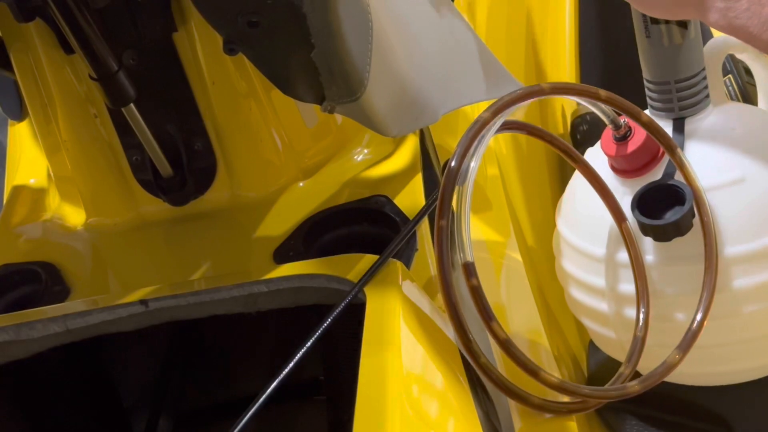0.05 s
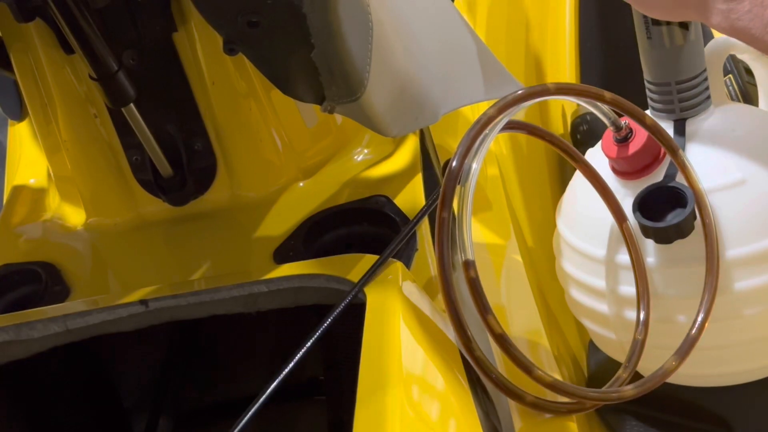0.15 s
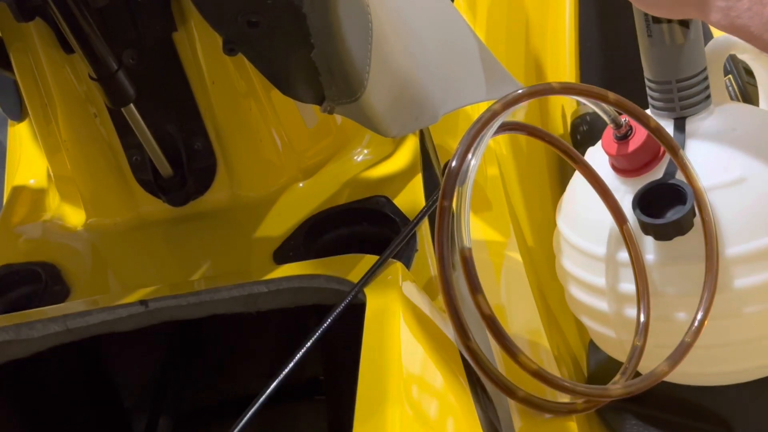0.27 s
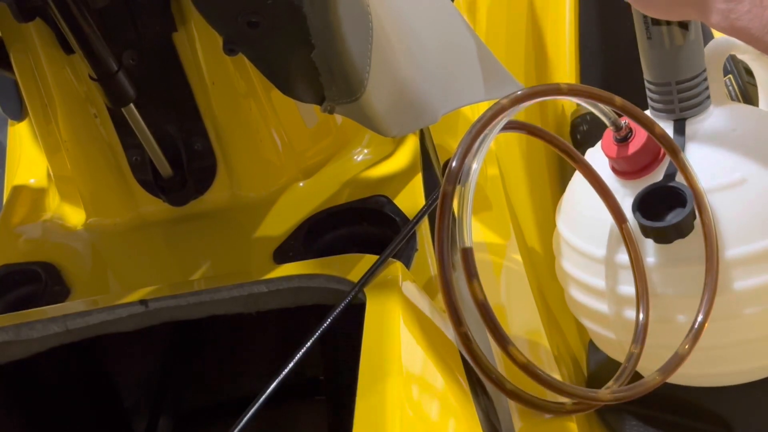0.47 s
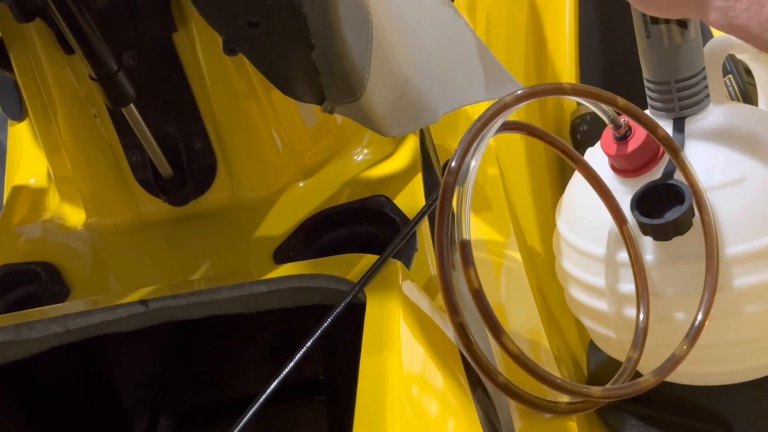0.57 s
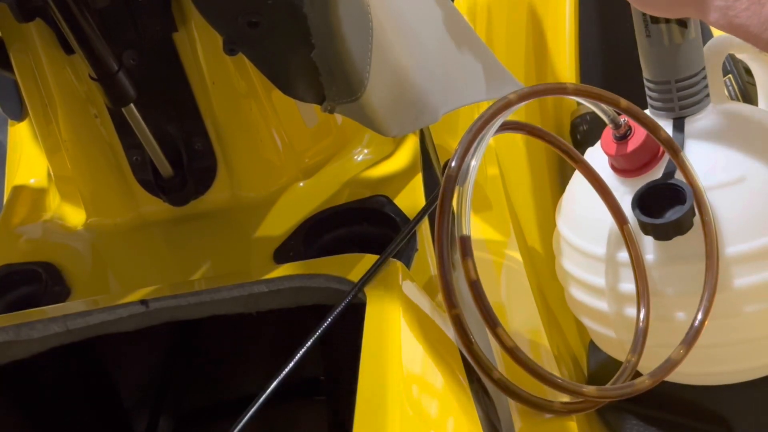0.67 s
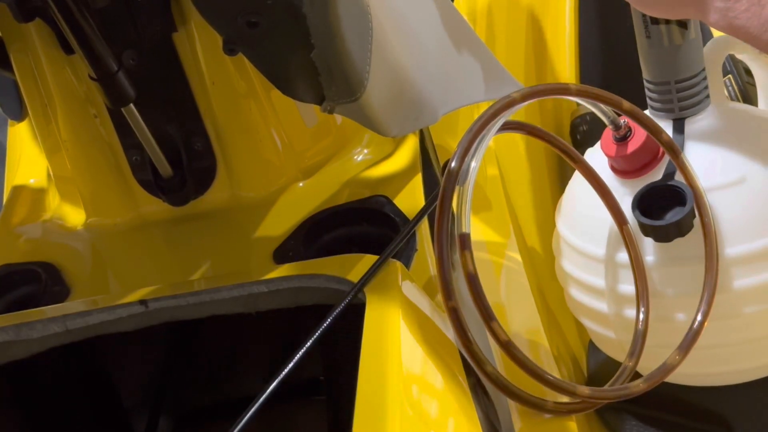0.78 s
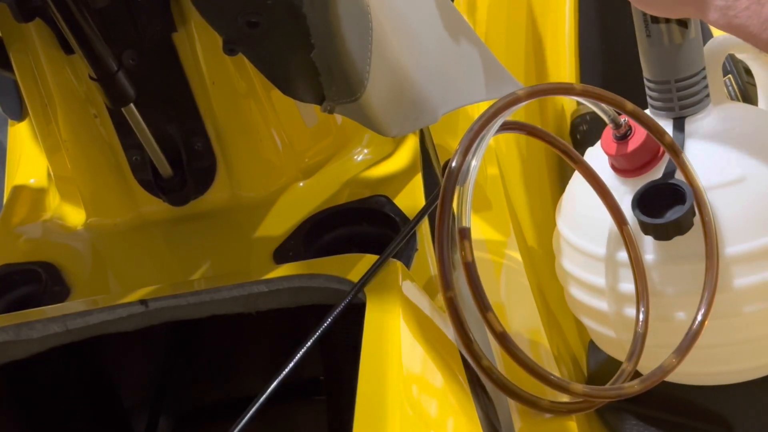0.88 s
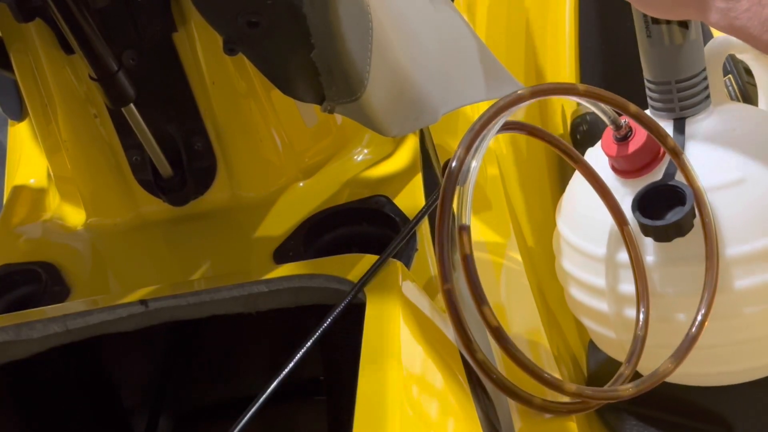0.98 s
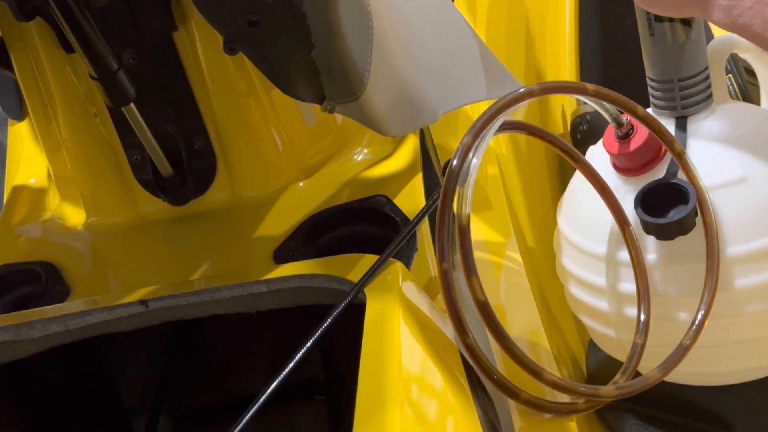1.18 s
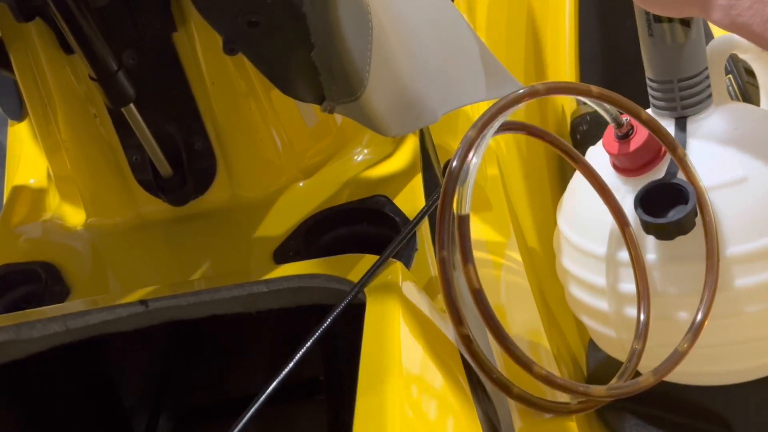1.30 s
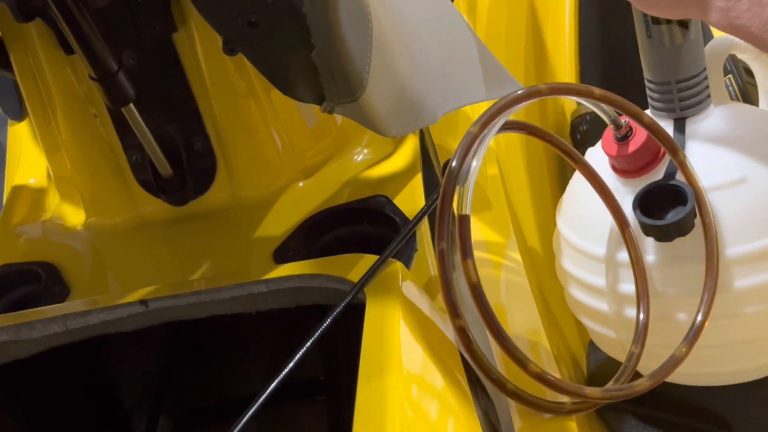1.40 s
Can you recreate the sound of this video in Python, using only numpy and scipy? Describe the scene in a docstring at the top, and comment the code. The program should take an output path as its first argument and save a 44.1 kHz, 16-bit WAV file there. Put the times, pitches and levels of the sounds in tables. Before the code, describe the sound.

A hand pump knocks hollowly three times, with rubbing and hissing air between strokes.

```python
"""A soft rub ends in a hollow knock: a hand pump on a plastic oil-extractor tank is pushed down.
It goes up and down again, and its piston rubs, hisses and knocks at each end of its travel.
The hollow tank answers each knock with a short note, and the garage around it booms.
A puff of air escapes after each downstroke. Faint whistles, light taps of the loose handle
and a low, steady background noise go with the pumping."""
import sys
import numpy as np
from scipy import signal
from scipy.fft import rfft, irfft
from scipy.io import wavfile
from scipy.ndimage import map_coordinates

SR = 44100
rng = np.random.default_rng(int(sys.argv[2]) if len(sys.argv) > 2 else 0)


def bounce(signal):
    """Save signal as a 16-bit WAV file at the path given by the first command-line argument."""
    frames = np.transpose(np.atleast_2d(signal))
    limited = np.clip(frames, -1, 1)
    pcm = np.round(limited * 32767).astype(np.int16)
    wavfile.write(sys.argv[1], SR, pcm)


N = 63945

# The piston hitting its stops:
# start_s, tank_db, pitch_factor, upper_tones_db, crack_db, crack_hold_s, thump_db, boom_db
KNOCKS = [(0.2206, 1.5, 1.025, -2, -23.5, 0.0036, -19.5, -33.5),
          (0.678, 1, 1.02, 4.5, -19.5, 0.0012, -29, -37),
          (1.1109, 1, 1.036, -0.5, -21.5, .0035, -18, -28.5)]
# The tones of the hollow tank: pitch_hz, level_db, fade_s (time to fall by 60 dB)
TANK_TONES = [(453.6, -16.5, 0.035), (614.8, -1, 0.033), (674.6, -2.5, 0.028), (779, -14, 0.016),
              (941.7, -9.5, 0.03), (1034, -14.5, 0.023), (1302, -26.5, 0.042), (1940, -25.5, 0.027),
              (2580, -39, 0.024), (3440, -42, 0.022), (3816, -30, 0.021)]
# The low tones of its base: pitch_hz, level_db, fade_s
BASE_TONES = [(151.2, -4.5, 0.065), (191.7, 2.5, 0.041), (251.7, -4.5, 0.037), (358.4, -2, 0.061)]
# How alike the room sounds left and right: frequency_hz, likeness (1 = the same)
ROOM_LIKENESS = [(50, 1), (150, 1), (300, 0.74), (650, 0.21), (1300, 0.77), (2500, 1), (16000, 1)]
TANK_RISE_S, BASE_RISE_S = 0.0014, 0.0017


def amp(db):
    """Turns decibels into a gain."""
    return 10 ** (np.asarray(db) / 20)


def unit(x):
    """Scales a signal to an average (rms) level of 1."""
    return x / np.sqrt(np.mean(x ** 2) + 1e-20)


def read(points, hz):
    """Reads between a table's rows on a log-frequency axis."""
    row_hz, value = np.transpose(points)
    return np.interp(np.log(hz + 1), np.log(row_hz + 1), value)


def bins(x):
    """The frequencies in the spectrum of x."""
    return np.fft.rfftfreq(x.shape[-1], 1 / SR)


def add(mix, start_s, sound):
    """Mixes a sound in at the given time."""
    part = mix[max(round(start_s * SR), 0):][:len(sound)]
    part += sound[:len(part)]


def colour(x, points):
    """Turns frequencies up or down by rows of frequency_hz, level_db."""
    return irfft(rfft(x) * amp(read(points, bins(x))), x.shape[-1])


def pair(x, likeness):
    """Blends two unrelated signals into a left and right that are as alike as asked."""
    alike = np.clip(read(likeness, bins(x)), -1, 1)
    mid, side = rfft(x) * np.sqrt([(1 + alike) / 2, (1 - alike) / 2])
    return irfft(np.array([mid + side, mid - side]), x.shape[-1])


def ring(tones, rise_s, pitch=1, upper_db=0, upper_hz=830):
    """A struck object's tones build up quickly, then die away."""
    t = np.arange(SR) / SR
    ringing = sum(amp(db + upper_db * (hz > upper_hz) - 60 * t / fade_s)
                  * np.sin(2 * np.pi * hz * pitch * t) for hz, db, fade_s in tones)
    return ringing * (1 - np.exp(-(t / rise_s) ** 2))


def air(spectrum, flutter_db=1.93):
    """Swirling air hisses with a slight flutter, the same left and right."""
    flutter = unit(colour(rng.standard_normal(N), [(120, 0), (1200, -60)]))
    hiss = pair(rng.standard_normal((2, N)), [(1, 1)])
    return unit(colour(hiss, spectrum) * amp(flutter_db * flutter))


def stroke(start_s, end_s, db, rise_s, swell_db_per_s, stop_s=0.0025):
    """The loudness of one stroke: it gathers speed and stops dead."""
    t = np.arange(N) / SR
    rise = np.clip((t - start_s) / rise_s, 0, 1)
    swell = amp(db + swell_db_per_s * np.minimum(t - end_s, 0))
    return rise * swell * np.exp(-np.maximum(t - end_s, 0) / stop_s)


def background(level_db=-45.5):
    """A low, steady noise fills the room."""
    # The background's tone: frequency_hz, level_db
    spectrum = [(20, -19), (45, 1), (70, 11.5), (110, -2), (200, -5), (280, -12.5), (370, 2), (480, -4.5),
                (630, 8.5), (850, -5.5), (1300, -11.5), (3000, -23), (7000, -26), (11000, -39),
                (16000, -52)]
    return amp(level_db) * unit(colour(pair(rng.standard_normal((2, N)), ROOM_LIKENESS), spectrum))


def garage(x, car_db=-9.5, car_fade_s=0.095, delay_s=0.0055, build_s=0.0079):
    """Sound scatters quickly off a car's body and echoes longer around the room."""
    # How long the echo lasts: frequency_hz, fade_s
    fade_times = [(60, 0.87), (200, 0.38), (400, 0.41), (700, 0.56), (1500, 0.69), (4000, 0.8), (9000, 0.2),
                  (16000, 0.6)]
    # The echo's tone: frequency_hz, level_db
    spectrum = [(60, 4), (180, 1), (350, 4), (620, -8.5), (1000, -11), (1400, -6.5), (2000, -11),
                (3000, -12), (5000, -11), (8000, -4), (16000, -15)]
    t = np.arange(SR) / SR
    hz, frame_s, bands = signal.stft(rng.standard_normal((2, SR)), SR, nperseg=256)
    fade = amp(-60 * frame_s / read(fade_times, hz)[:, None])
    fade /= np.sqrt(SR * np.mean(fade ** 2, axis=1, keepdims=True))  # equal energy in each band
    tail = colour(signal.istft(bands * fade, SR, nperseg=256)[1][:, :SR], spectrum)
    scatter = unit(rng.standard_normal((2, SR)) * amp(-60 * t / car_fade_s)) / np.sqrt(SR)
    echo = pair(tail + amp(car_db) * scatter, ROOM_LIKENESS) * np.clip((t - delay_s) / build_s, 0, 1)
    return signal.fftconvolve(x[None], echo, axes=1)[:, :N]


def room_boom():
    """The room's low tones swell after each knock."""
    # The room's own tones: pitch_hz, level_db, fade_s
    room_tones = [(50.5, -9, 0.97), (72.45, 1, 1), (88.8, -4.5, 0.58), (184, -5.5, 0.59), (357, -8, 0.57),
                  (463.3, -21, 0.92)]
    out = np.zeros(N)
    for start_s, *_, boom_db in KNOCKS:
        add(out, start_s, amp(boom_db) * ring(room_tones, rise_s=0.014))
    return out


def whistles(level_db=-45):
    """Air squeezing past the seal and valve makes breathy, falling whistles."""
    # One whistle a row: start_s, end_s, from_hz, to_hz, width_hz, relative_db
    glides = [(.53, .572, 2300, 1950, 50, -7), (.575, .675, 1700, 1220, 70, -9),
              (.545, .635, 4850, 4000, 90, -12), (.62, .685, 2570, 2030, 40, -5),
              (.635, .685, 4800, 4400, 90, -13), (.505, .68, 5880, 5750, 200, -13),
              (.338, .378, 6000, 4500, 900, -1), (1.24, 1.28, 5900, 4400, 900, -1)]
    out = np.zeros(N)
    for start_s, end_s, from_hz, to_hz, width_hz, relative_db in glides:
        progress = np.clip((np.arange(N) / SR - start_s) / (end_s - start_s), 0, 1)
        phase = 2 * np.pi * np.cumsum(from_hz + (to_hz - from_hz) * progress) / SR
        narrow = 1 / (1 + (2 * bins(out) / width_hz) ** 2)
        wobble_a, wobble_b = irfft(rfft(rng.standard_normal((2, N))) * narrow, N)
        whistle = unit(wobble_a * np.cos(phase) + wobble_b * np.sin(phase))
        out += amp(level_db + relative_db) * whistle * np.sin(np.pi * progress)
    return out


def valve_puffs(open_s=0.009, rise_db_per_s=253, fall_db_per_s=263):
    """A valve opens; the escaping air swells and dies away."""
    # One puff a row: start_s, peak_s, level_db
    puffs = [(0.31, 0.355, -36.5), (1.213, 1.259, -36)]
    # A puff's tone: frequency_hz, level_db
    spectrum = [(800, 5), (3500, -7.5), (5300, -3.5), (6300, -1), (7300, 5), (9000, -2), (10100, 2.5),
                (12500, -7), (16000, -3)]
    t, level = np.arange(N) / SR, np.zeros(N)
    for start_s, peak_s, db in puffs:
        opening = np.clip((t - start_s) / open_s, 0, 1)
        swell_db = np.minimum(rise_db_per_s * (t - peak_s), fall_db_per_s * (peak_s - t))
        level += opening * amp(db + swell_db)
    return air(spectrum) * level


def intake_hiss(column_hz=1323, growth_per_s=4.8, echo_gain=0.25):
    """Air drawn in echoes along the barrel; the air column lengthens, so its tones fall."""
    # Upstrokes: start_s, end_s, level_db, rise_s, swell_db_per_s
    pulls = [(0.491, 0.677, -42, 0.086, 32), (1.393, 1.56, -41, 0.065, 28)]
    # The incoming air's tone: frequency_hz, level_db
    spectrum = [(300, -29), (1300, 0), (2200, 1), (3500, -2.5), (5800, -1.5), (6800, -2), (8000, -2.5),
                (9200, 0.5), (10600, 4), (12500, -9), (16000, -3)]
    n, out = np.arange(N), np.zeros((2, N))
    for pull in pulls:
        trip_samples = SR / column_hz * (1 + growth_per_s * np.maximum(n / SR - pull[0], 0))
        echoes = [sum(echo_gain ** k * map_coordinates(side, [n - k * trip_samples], mode="wrap")
                      for k in range(5)) for side in air(spectrum)]
        out += unit(np.array(echoes)) * stroke(*pull)
    return out


def piston_rub():
    """The piston's seal rubs down the barrel."""
    # Downstrokes: start_s, end_s, level_db, rise_s, swell_db_per_s
    pushes = [(-0.012, 0.259, -46.5, 0.1, 5.5), (0.926, 1.111, -43.5, 0.093, 5)]
    # The rub's tone: frequency_hz, level_db
    spectrum = [(200, -17), (700, -0.5), (1200, -3), (1750, 4.5), (2400, -3), (3400, -6.5), (4300, -16.5),
                (7500, -12.5), (10000, -13), (11500, -22), (16000, -25)]
    return air(spectrum) * sum(stroke(*push) for push in pushes)


def handle_taps(tick_lead_s=0.011, tick_s=0.003):
    """The loose handle ticks, then lightly bumps the tank."""
    # One tap a row: start_s, tank_db, pitch_factor, thump_db, thump_pitch_factor, tick_db
    taps = [(.401, -24, 1.13, -39.5, 1.0, -64), (.827, -19.5, 1.09, -25.5, 1.72, -44),
            (.858, -22.5, 1.065, -33.5, 1.02, -69), (1.0890, -19.5, 1.165, -33, 1.2, -56),
            (1.309, -23, 1.1, -34.5, 1.0, -62)]
    # A tick's tone: frequency_hz, level_db
    spectrum = [(1000, -4), (8000, 1), (11000, -5), (16000, -14)]
    out, t = np.zeros(N), np.arange(2048) / SR
    for start_s, tank_db, pitch, thump_db, thump_pitch, tick_db in taps:
        add(out, start_s, amp(tank_db) * ring(TANK_TONES, TANK_RISE_S, pitch))
        add(out, start_s, amp(thump_db) * ring(BASE_TONES, BASE_RISE_S, thump_pitch))
        noise = unit(colour(rng.standard_normal(len(t)), spectrum))
        add(out, start_s - tick_lead_s, amp(tick_db) * t / tick_s * np.exp(-t / tick_s) * noise)
    return out


def piston_knocks(rise_s=0.00044, fall_s=0.0042, tank_lag_s=0.0006):
    """Each stop cracks, then rings the tank and base. Gives the direct sound and the room's share."""
    # A crack's tone: frequency_hz, level_db
    spectrum = [(300, -6), (1200, 4), (2800, -0.5), (3600, 0.5), (4500, -10), (6000, -7), (8500, -6.5),
                (11000, -15.5), (16000, -32)]
    body, cracks, room_clicks = np.zeros((3, N))
    t = np.arange(2048) / SR
    # Summed over all directions a crack's spectrum is smooth, so the room gets a clean click.
    click = unit(colour(signal.unit_impulse(len(t), "mid"), spectrum))
    for start_s, tank_db, pitch, upper_db, crack_db, hold_s, thump_db, _ in KNOCKS:
        level = amp(crack_db) * np.minimum(t / rise_s, 1) * np.exp(-np.maximum(t - hold_s, 0) / fall_s)
        add(cracks, start_s, level * unit(colour(rng.standard_normal(len(t)), spectrum)))
        add(room_clicks, start_s + hold_s - t[-1] / 2, click * np.sqrt(np.mean(level ** 2)))
        note = amp(tank_db) * ring(TANK_TONES, TANK_RISE_S, pitch, upper_db)
        thump = amp(thump_db) * ring(BASE_TONES, BASE_RISE_S)
        add(body, start_s + tank_lag_s + hold_s / 2, note + thump)
    return body + cracks, body + room_clicks


def scene(hiss_to_room_db=-7.5, pan_db=0.2):
    """Mixes pump, room and background; the sound around each knock gets its own echo."""
    knocks, knocks_to_room = piston_knocks()
    taps = handle_taps()
    hiss = piston_rub() + intake_hiss() + valve_puffs() + whistles()
    to_room = knocks_to_room + taps + amp(hiss_to_room_db) * hiss.mean(0)
    nearest_knock = np.argmin([abs(np.arange(N) / SR - start_s) for start_s, *_ in KNOCKS], axis=0)
    echo = sum(garage(to_room * (nearest_knock == k)) for k in range(len(KNOCKS)))
    hits = (knocks + taps) * amp([[pan_db], [-pan_db]])
    return hits + hiss + room_boom() + echo + background()


def record(dry, ceiling=0.97, cutoff_hz=15900):
    """Two microphone openings shift left against right; peaks are rounded and the top treble is cut."""
    # How far the left wave runs ahead of the right: frequency_hz, lead_radians
    left_lead = [(20, 0.5), (6700, -0.5), (7400, 1.38), (7800, 2), (8700, 4), (9400, 0.91), (10700, 0.52),
                 (13000, 0.6), (14000, -1.4), (16000, -2)]
    turn = np.exp(0.5j * read(left_lead, bins(dry)) * np.array([[1], [-1]]))
    shifted = irfft(rfft(dry) * turn, N)
    rounded = shifted / (1 + (shifted / ceiling) ** 8) ** (1 / 8)
    low_pass = signal.firwin(511, cutoff_hz, window=("kaiser", 9), fs=SR)
    return signal.oaconvolve(rounded, low_pass[None], "same")


dry = scene()
out = record(dry)
bounce(out)
```